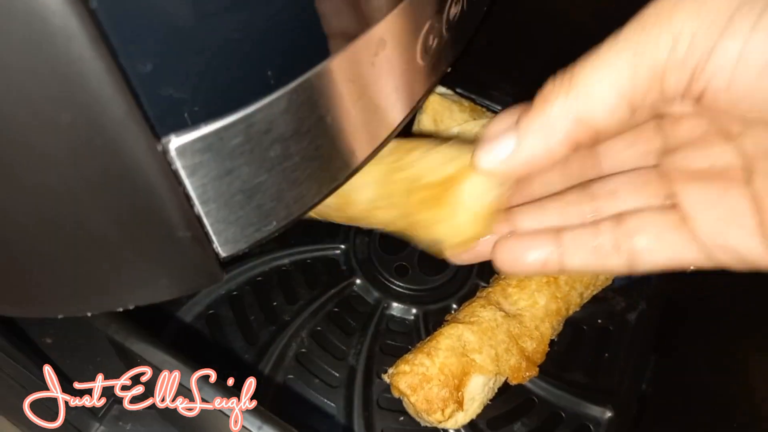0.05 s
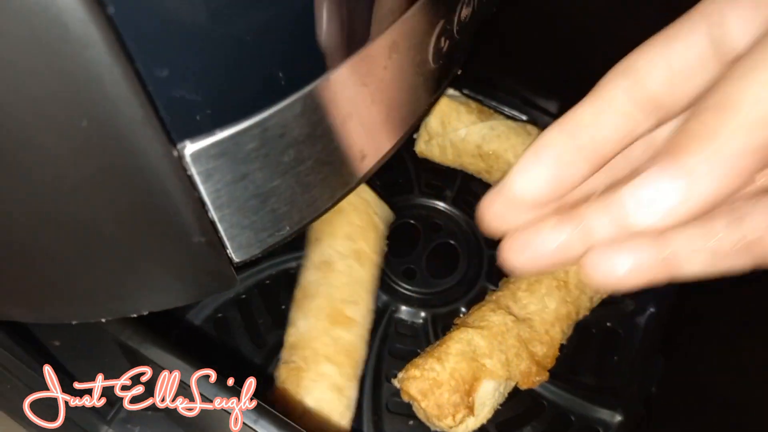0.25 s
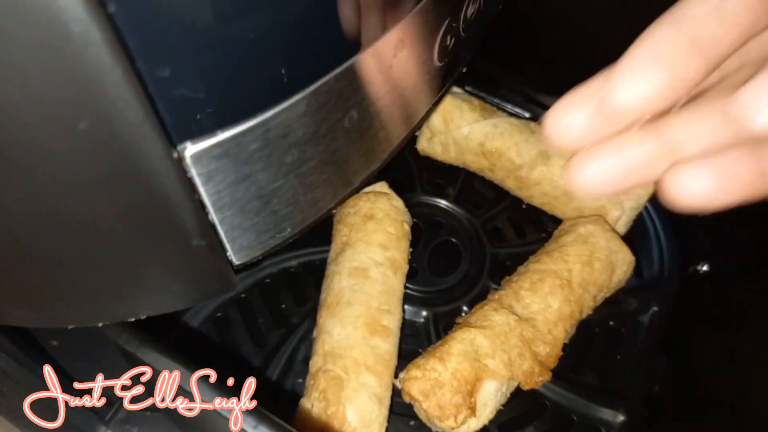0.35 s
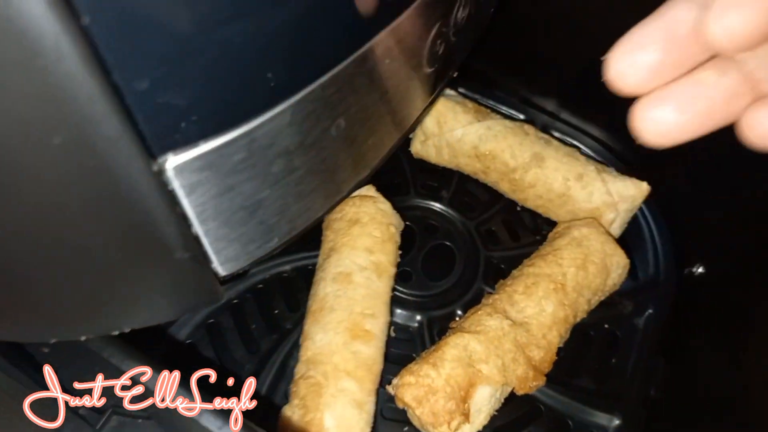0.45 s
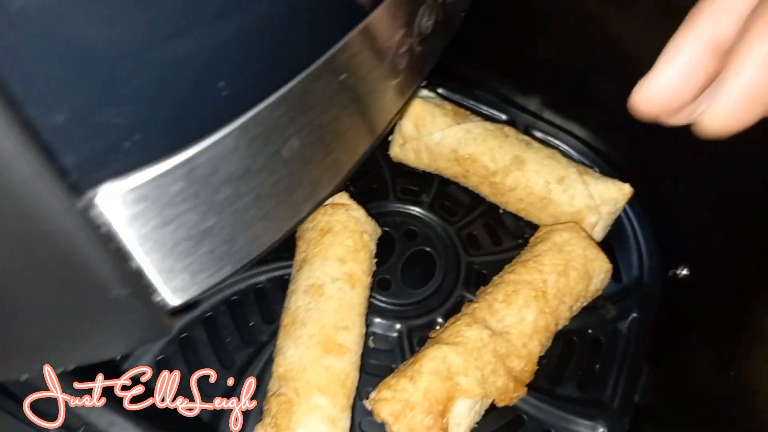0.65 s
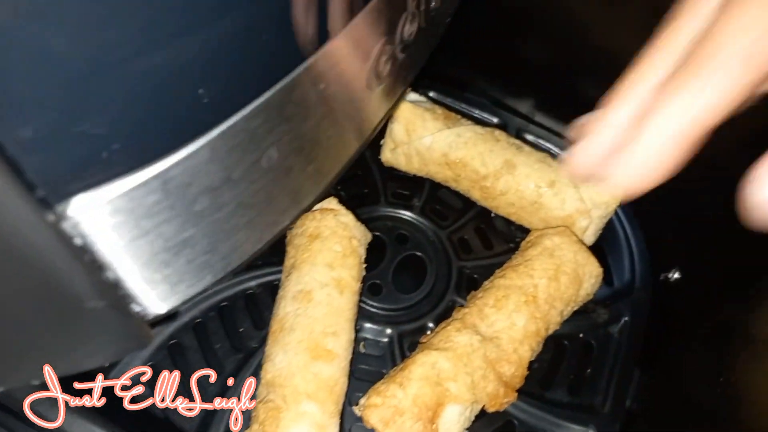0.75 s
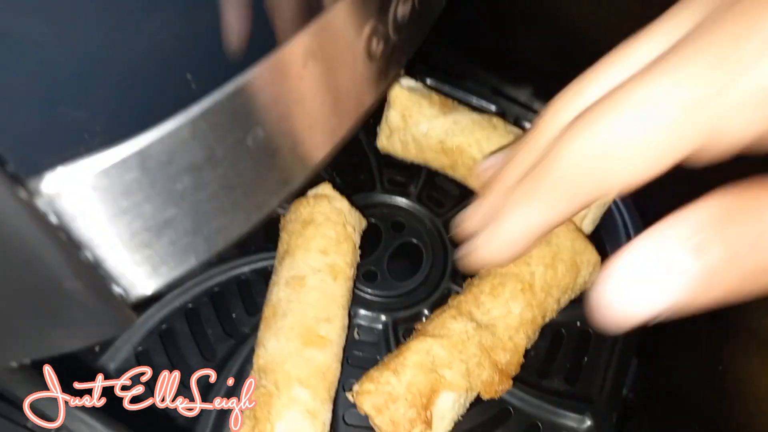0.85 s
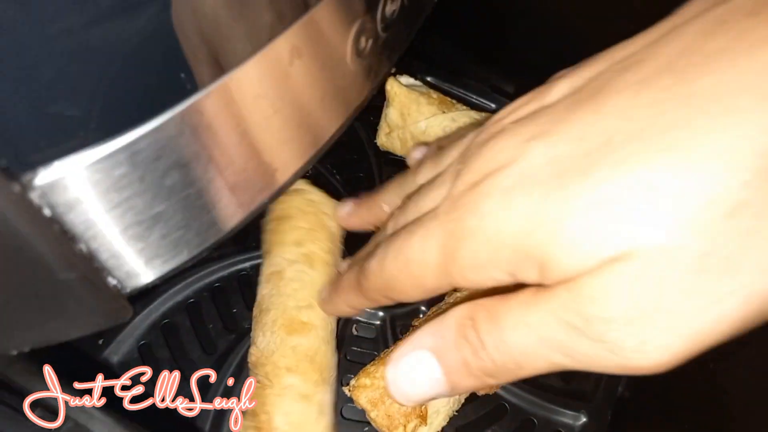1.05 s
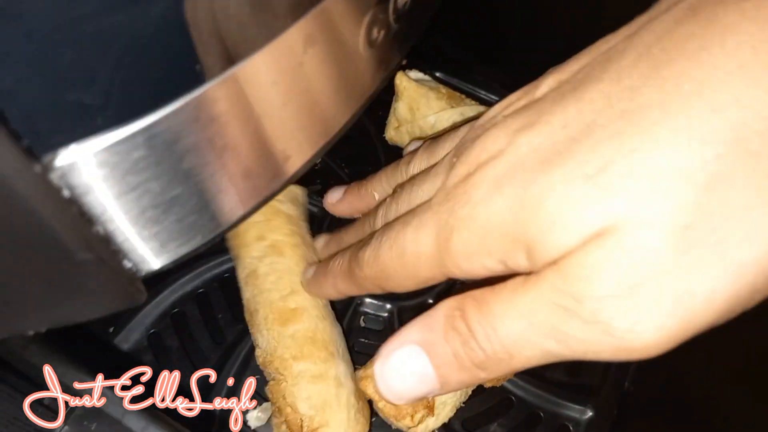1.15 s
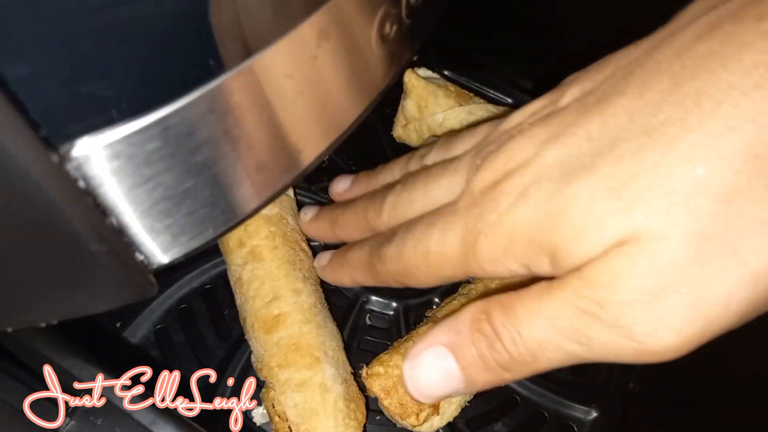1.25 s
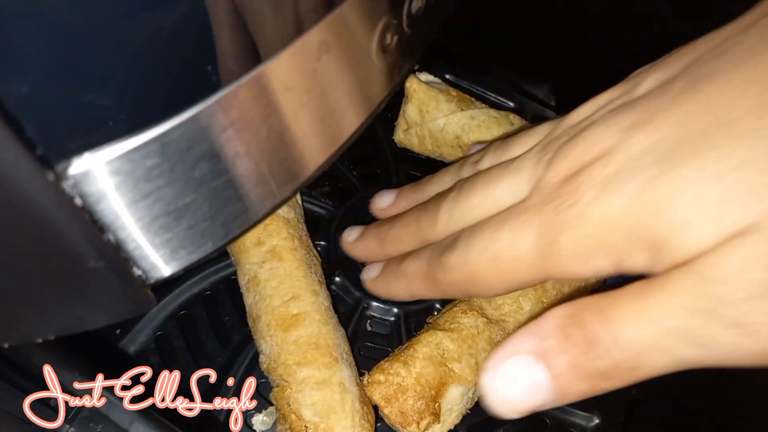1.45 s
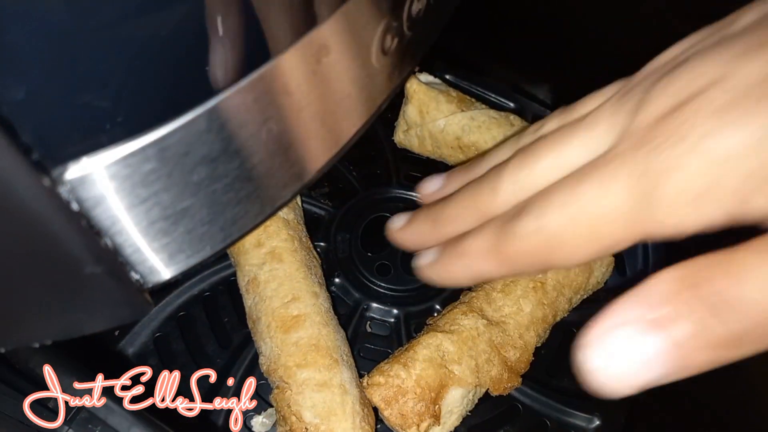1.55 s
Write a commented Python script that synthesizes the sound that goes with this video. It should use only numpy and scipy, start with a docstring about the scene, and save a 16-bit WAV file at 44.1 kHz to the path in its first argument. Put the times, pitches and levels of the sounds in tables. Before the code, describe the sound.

A spring roll drops into an air fryer basket, close up, with a dull, chattering thump from about 0.2 to 0.4 seconds, its crisp skin scraping the grate. Fingers rustle lightly and crumbs tick, clearest from 0.5 to 0.8 seconds, then fainter. A hand softly bumps the basket near 1.2 seconds. The quiet kitchen's faint low hum, hiss and thin whine last until the end at 1.6 seconds.

```python
"""A quiet kitchen, the microphone close to the basket of an air fryer as a spring roll is dropped in.
One end touches down and the roll flops over, ringing the basket in a dull, chattering thump while
its crisp skin scrapes the grate. Fingers rustle, crumbs tick and the hand bumps the basket softly.
Behind it all lie a low hum, a thin whine and hiss."""
import sys
import numpy as np
from scipy import signal
from scipy.fft import rfft, irfft
from scipy.io import wavfile
from scipy.ndimage import uniform_filter1d

SR = 44100
rng = np.random.default_rng(int(sys.argv[2]) if len(sys.argv) > 2 else 0)


def log_audio(samples):
    """Write samples as a 16-bit WAV file to the path given in sys.argv[1]."""
    # one column per channel
    frames = np.atleast_2d(samples).T
    # limit to full scale, then quantise
    limited = np.clip(frames, -1, 1)
    pcm = np.round(limited * 32767).astype(np.int16)
    wavfile.write(sys.argv[1], SR, pcm)


N = 70560
TIME = np.arange(N) / SR
BINS = np.fft.rfftfreq(N, 1 / SR)


def basket_knocks(muffle_hz=575, muffle_db=-10):
    """Soft force pulses from the roll and the hand ring the modes of the basket in its housing."""
    # Each row: start in seconds, level in dB, contact time in milliseconds.
    roll_hits = [(0.1644, -23.5, 9.9), (0.1909, -28, 3.24), (0.1995, -28, 4.3), (0.2063, -18, 6.5),
                 (0.216, -20, 6.6), (.2521, -25.5, 3.25), (.2659, -25.5, 1.25), (.2742, -14, 2.57),
                 (.2847, -27, 1.1), (.292, -27, 4), (0.3021, -27, 8), (.312, -30, 1.82), (0.3237, -38, 2.6),
                 (0.3483, -30, 3.12), (0.3663, -43, 1.17), (0.3929, -33, 3.25), (0.4243, -32, 4.8),
                 (.4561, -39, 3.23)]
    hand_hits = [(0.095, -31, 19), (1.178, -37.5, 13)]
    # Each row: pitch in Hz, level in dB, seconds to fade by 60 dB, left over right in dB.
    modes = [(76.2, -13, 0.41, 1.7), (114.6, -8, 0.21, 3), (181, -8.5, 0.34, 0), (208.7, -10, .28, 1),
             (231.8, -3.5, 0.1, -2.5), (301.7, -6.5, 0.32, -5.5), (326.2, -10, 0.24, -2),
             (362.3, 4.5, 0.067, -3.5), (462.2, -5.5, .13, -10), (491, 0.1, 0.04, -9),
             (627.3, -5, 0.16, -6), (780, -12, 0.18, 6), (934.6, 6, 0.048, 9), (1480, -11, 0.26, 23)]
    force = np.zeros(N)
    for start, db, contact_ms in roll_hits + hand_hits:
        age = np.maximum(TIME - start, 0) * 4000 / contact_ms  # in quarters of the contact time
        pulse = age ** 2 * np.exp(-np.minimum(age, 60))
        force += amp(db) * pulse / pulse.sum()
    muffle = amp(muffle_db * (1 - 1 / (1 + (BINS / muffle_hz) ** 20)))  # the soft filling dulls it
    ring = sum(pan(side_db) * amp(db - 60 * TIME / t60) * np.cos(2 * np.pi * hz * TIME)
               for hz, db, t60, side_db in modes)
    return -irfft(rfft(force) * muffle * rfft(ring), N)


def skin_scrape():
    """The crisp skin sticks and slips over the grate while the basket rumbles under it."""
    # Each row: time in seconds, level in dB.
    slide_levels = [(0, -108), (.168, -108), (.185, -59), (.24, -68.5), (.255, -54), (.261, -45),
                    (.29, -51.5), (.35, -53), (.378, -54.5), (.41, -64.5), (.47, -66.5), (.56, -87),
                    (.7, -110)]
    rumble_levels = [(0, -99), (.165, -69), (.185, -43), (.22, -52.5), (.275, -40), (.34, -47), (.39, -58),
                     (.43, -63), (.5, -67), (.65, -73)]
    # Each row: frequency in Hz, relative noise density in dB.
    crust_spectrum = [(200, 13.5), (700, 8.5), (1050, -8), (1300, -4), (1850, -7), (2400, 2), (3500, -1),
                      (6500, 1), (8000, -9), (11500, 0.5), (15500, -2)]
    rumble_spectrum = [(45, -42), (90, 8), (135, 1.5), (340, -2), (520, -13.5), (600, -26.5), (770, -10.5),
                       (850, -21), (980, -13.5), (1200, -38), (3000, -46)]
    crackle = colour(grains(per_s=8300, spread_db=1.5), crust_spectrum)
    sliding = level(slide_levels) * flutter(depth_db=1.1, rate_hz=79.4) * crackle
    return sliding + level(rumble_levels) * noise(rumble_spectrum)


def grate_rasp(centre_s, width_s, hz, width_hz, db):
    """A brief swell of tiny slips sounds one broad resonance of the grate."""
    slips = resonate(grains(per_s=1200, spread_db=2.0), hz, width_hz)
    swell = np.exp(-((TIME - centre_s) / width_s) ** 2)
    return amp(db) * slips * swell


def finger_rustle():
    """Fingertips rub loose, dry crust into a fine rustle."""
    # Each row: time in seconds, level in dB.
    rub_levels = [(0, -107), (.1, -80), (.168, -70.5), (.183, -60.5), (.225, -63), (.3, -64), (.355, -54.5),
                  (.42, -66), (.47, -64), (.498, -60.5), (.535, -65.5), (.58, -63), (.61, -64.5),
                  (.69, -66), (.78, -72), (.95, -74), (1.08, -80), (1.13, -70), (1.22, -66.5), (1.3, -75.5),
                  (1.44, -76.5), (1.6, -85)]
    # Each row: frequency in Hz, relative noise density in dB.
    flake_spectrum = [(500, -19), (3200, -26), (5000, 0.5), (6500, 7.5), (8000, -3.5), (10000, 4),
                      (12500, 5), (15500, 2.5)]
    rubbing = level(rub_levels) * flutter(depth_db=1.8, rate_hz=59.6)
    return rubbing * colour(grains(per_s=9000, spread_db=1.5), flake_spectrum)


def crumb_ticks(rise_s=0.0005, fall_s=0.0025):
    """Each flake of crust snaps in a noise burst of a few milliseconds."""
    # Each row: start in seconds, level in dB.
    snaps = [(0.12, -52.5), (.178, -53), (0.261, -47), (0.4946, -58), (.511, -56), (0.555, -44.5),
             (0.573, -47.5), (0.6153, -62), (.63, -43.5), (0.711, -48.5), (0.7218, -53), (.7587, -52),
             (0.8377, -55), (0.956, -60), (1.1116, -59), (1.152, -55), (1.201, -59), (1.3106, -59),
             (1.4282, -62)]
    # Each row: frequency in Hz, relative noise density in dB.
    snap_spectrum = [(3000, -21), (4500, -2.5), (6000, 5), (8000, 0.5), (15500, 6)]
    bursts = np.zeros(N)
    for start, db in snaps:
        age = np.maximum(TIME - start, 0)
        bursts += amp(db) * np.minimum(age / rise_s, 1) * np.exp(-age / fall_s)
    return colour(bursts * rng.standard_normal((2, N)), snap_spectrum)


def hand_rumble():
    """The hand moves at the basket; the hollow housing colours its low, soft bumping."""
    # Each row: time in seconds, level in dB.
    hand_levels = [(0, -65), (.1, -54), (.14, -63.5), (.18, -43.5), (.42, -59.5), (.58, -58), (.67, -68.5),
                   (.8, -63), (1.08, -67), (1.19, -58.5), (1.28, -62), (1.42, -61), (1.6, -70.5)]
    # Each row: frequency in Hz, relative noise density in dB.
    housing_spectrum = [(40, -32.5), (58, 0.5), (68, 2.5), (80, 3.5), (96, -2), (112, 9), (135, -18),
                        (170, -22), (210, -35), (300, -15), (600, -29.5), (1500, -48)]
    return level(hand_levels) * noise(housing_spectrum)


def reflections(x, build_s=0.018):
    """The drawer and kitchen return a diffuse tail, each band dying at its own speed."""
    # Each row: frequency in Hz, seconds to fade by 60 dB.
    decay_times = [(100, 0.43), (500, 0.29), (2000, 0.34), (12000, 0.14)]
    hz, t, bands = signal.stft(rng.standard_normal((2, N)), SR, nperseg=512)
    decay = amp(-60 * t / read(decay_times, hz)[:, None])
    tail = signal.istft(bands * decay, SR, nperseg=512)[1][:, :N]
    tail *= np.minimum(TIME / build_s, 1)
    tail = colour(tail, [(1, 0), (SR, 0)])  # flat: only draws the channels together in the bass
    return signal.fftconvolve(x, tail / np.linalg.norm(tail[0]), axes=1)[:, :N]


def low_hum():
    """Three steady low tones over a deeper one that swells and sinks."""
    # Each row: pitch in Hz, level in dB, waver in Hz, left over right in dB.
    hum_tones = [(113, -75.5, 2.3, 7.5), (286.4, -73, 2.4, -7), (580, -85.5, 2.94, -9)]
    # Each row: time in seconds, level of the deepest tone in dB.
    drone_levels = [(0, -61), (.4, -49.5), (.68, -78.5), (.82, -62.5), (1.1, -68.5), (1.24, -73),
                    (1.35, -58.5), (1.6, -61.5)]
    steady = sum(amp(db) * pan(side_db) * tone(hz, waver) for hz, db, waver, side_db in hum_tones)
    return steady + level(drone_levels) * pan(db=1.5) * tone(hz=57, waver_hz=0.46)


def thin_whine(pitch_hz=1568):
    """A tone blurred by narrow noise comes and goes, with faint tones fluttering far above it."""
    # Each row: time in seconds, level in dB.
    whine_levels = [(0, -94), (.7, -92), (.82, -85.5), (.87, -80), (1.03, -77.5), (1.1, -85), (1.18, -80),
                    (1.25, -90.5), (1.31, -83.5), (1.37, -86.5), (1.43, -81.5), (1.6, -77.5)]
    # Each row: pitch in Hz, level in dB, waver in Hz, left over right in dB.
    high_tones = [(6140, -86.5, 13, 14), (6670, -84, 8.6, -10)]
    blur = resonate(rng.standard_normal((2, N)), pitch_hz, width_hz=61)
    whine = level(whine_levels) * (tone(pitch_hz, waver_hz=13.7) + blur)
    high = sum(amp(db) * pan(side_db) * tone(hz, waver) * flutter(depth_db=3.5, rate_hz=13)
               for hz, db, waver, side_db in high_tones)
    return whine + high


def room_tone(db=-67):
    """The steady noise floor of the kitchen and the microphone."""
    # Each row: frequency in Hz, relative noise density in dB.
    floor_spectrum = [(25, -52), (60, 1), (110, 0), (165, 4), (200, -8.5), (300, -8), (600, -13),
                      (900, -21), (1400, -18), (1900, -21.5), (3500, -29.5), (4300, -10), (6800, -15.5),
                      (7600, -22.5), (12000, -27), (15500, -32.5)]
    # Each row: frequency in Hz, left over right in dB.
    balance = [(60, 10), (200, -0.5), (420, -15.5), (620, -7), (900, -0.5), (3000, 0), (5000, 5),
               (12000, 4)]
    return amp(db) * irfft(rfft(noise(floor_spectrum)) * pan(read(balance, BINS)), N)


def amp(db):
    """Decibels to gain."""
    return 10 ** (np.asarray(db) / 20)


def unit(x):
    """Scales to rms 1."""
    return x / np.sqrt(np.mean(x ** 2) + 1e-20)


def read(points, hz):
    """Reads a table on a log-frequency axis."""
    frequencies, values = np.transpose(points)
    return np.interp(np.log(hz + 1), np.log(frequencies + 1), values)


def level(points):
    """Gain over time from rows of seconds and dB."""
    return amp(np.interp(TIME, *np.transpose(points)))


def pan(db):
    """Left and right gains, the left louder by db."""
    return amp(np.array([[.5], [-.5]]) * db)


def colour(x, spectrum):
    """Gives two unrelated channels a spectrum, and makes them alike in the bass."""
    # Each row: frequency in Hz, correlation of left and right.
    likeness = [(100, 0.9), (300, 1), (600, 0.41), (1200, -0.21), (5000, -0.075), (15000, -0.042)]
    left, unrelated = rfft(x)
    shared = np.clip(read(likeness, BINS), -1, 1)
    right = shared * left + np.sqrt(1 - shared ** 2) * unrelated
    gain = unit(amp(read(spectrum, BINS)))
    return irfft(np.array([left, right]) * gain, N)


def noise(spectrum):
    """Stereo noise of rms 1 with the given spectrum."""
    return unit(colour(rng.standard_normal((2, N)), spectrum))


def grains(per_s, spread_db):
    """Tiny fractures of random size at random moments."""
    size = amp(spread_db * np.minimum(rng.exponential(1, N), 5))
    breaks = rng.random(N) < per_s / SR
    return unit(size * breaks * rng.standard_normal((2, N)))


def tone(hz, waver_hz):
    """A sine of rms 1 whose pitch wavers at random."""
    pitch = hz + waver_hz * unit(uniform_filter1d(rng.standard_normal(N), size=900))
    return np.sqrt(2) * np.sin(2 * np.pi * (np.cumsum(pitch) / SR + rng.random()))


def resonate(x, hz, width_hz):
    """Passes x through one steep-sided resonance reaching width_hz to either side; rms 1."""
    return unit(irfft(rfft(x) / (1 + ((BINS - hz) / width_hz) ** 4), N))


def flutter(depth_db, rate_hz):
    """A gain that flickers at random, up to about rate_hz."""
    return amp(depth_db * resonate(rng.standard_normal(N), 0, rate_hz))


def scene():
    """The close thump and crisp sounds with their reflections, over the quiet kitchen."""
    settle = grate_rasp(centre_s=0.32, width_s=0.043, hz=1424, width_hz=232, db=-58.5)
    nudge = grate_rasp(centre_s=1.233, width_s=0.12, hz=530, width_hz=300, db=-74.5)
    thump = basket_knocks()
    crisp = skin_scrape() + settle + nudge + finger_rustle() + crumb_ticks()
    tail = reflections(amp(-17.5) * thump + amp(-11) * crisp)
    return thump + crisp + tail + hand_rumble() + room_tone() + low_hum() + thin_whine()


def record(dry):
    """The microphone drops the deepest bass steeply and loses the very top of the treble."""
    bass_cut_hz, treble_cut_hz = 40, 15650
    thinned = signal.sosfilt(signal.butter(2, bass_cut_hz, "highpass", fs=SR, output="sos"), dry)
    steeper_cut = 1 - 1 / (1 + (BINS / bass_cut_hz) ** 4)
    thinned = irfft(rfft(thinned) * steeper_cut, N)
    lowpass = signal.firwin(511, treble_cut_hz, window=("kaiser", 9), fs=SR)
    return signal.oaconvolve(thinned, lowpass[None], "same")


dry = scene()
out = record(dry)
log_audio(out)
```